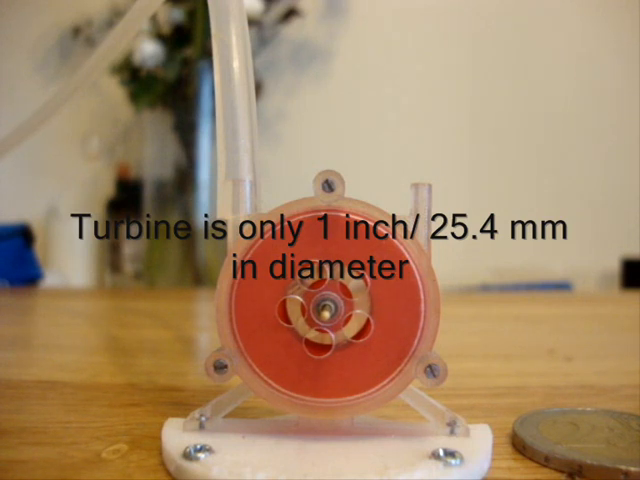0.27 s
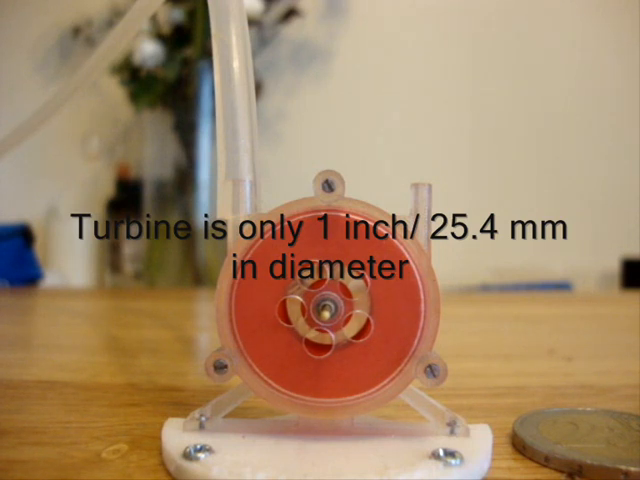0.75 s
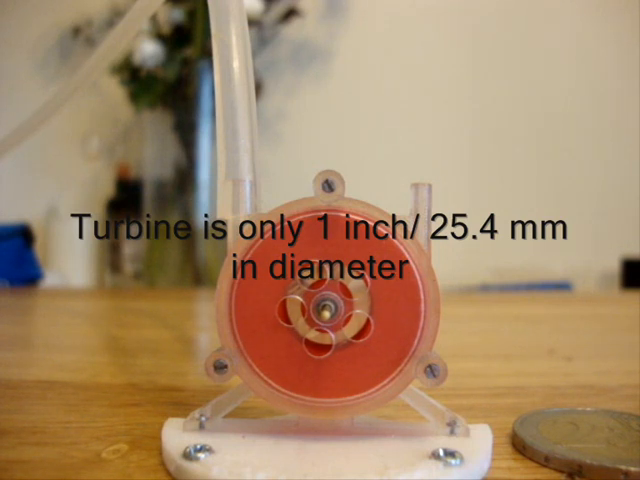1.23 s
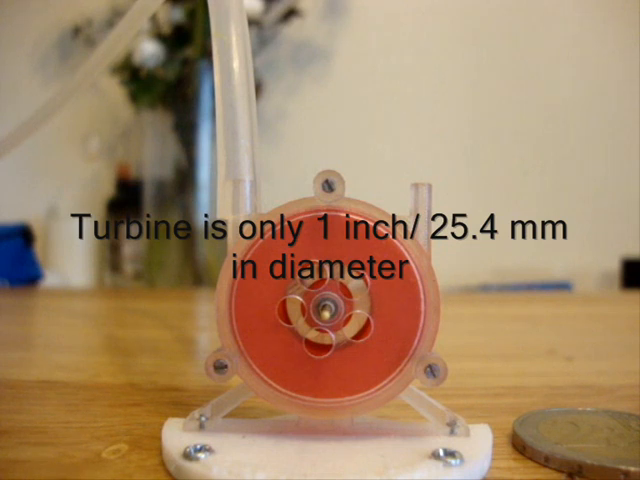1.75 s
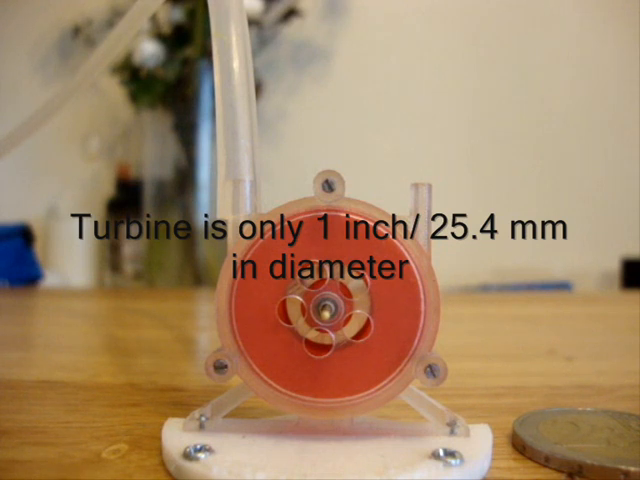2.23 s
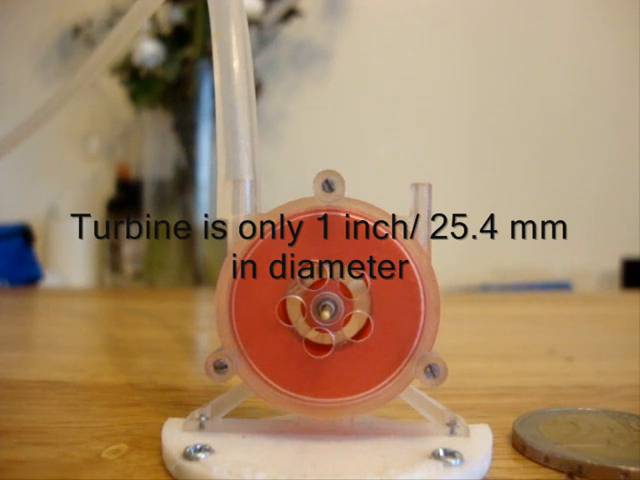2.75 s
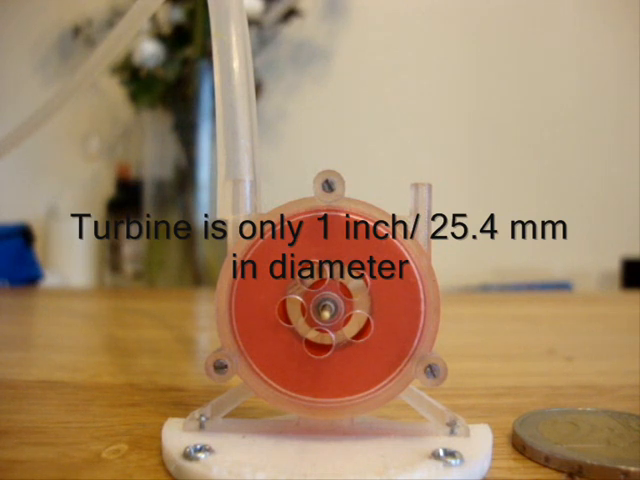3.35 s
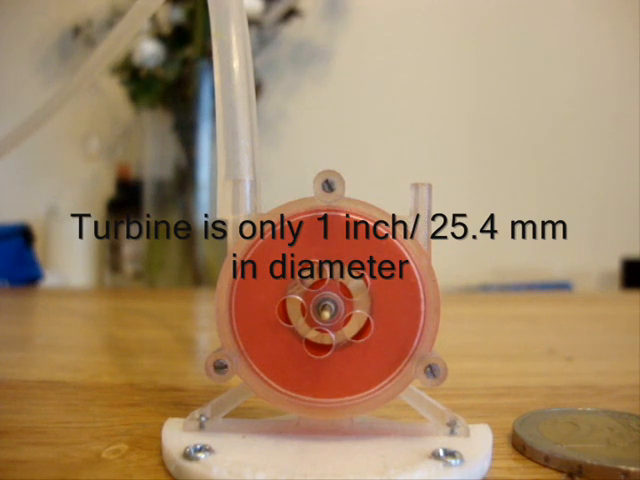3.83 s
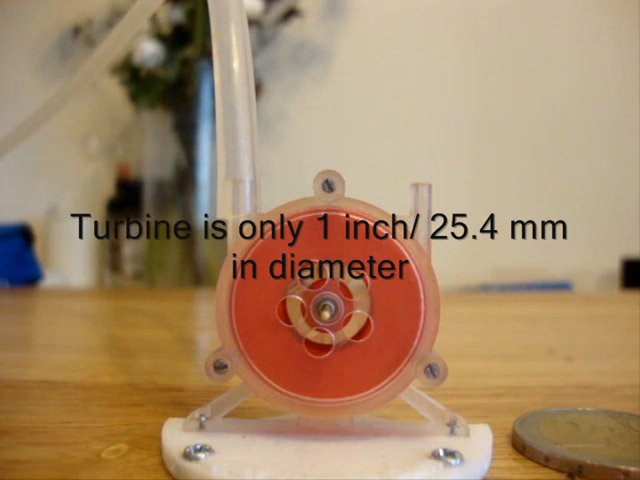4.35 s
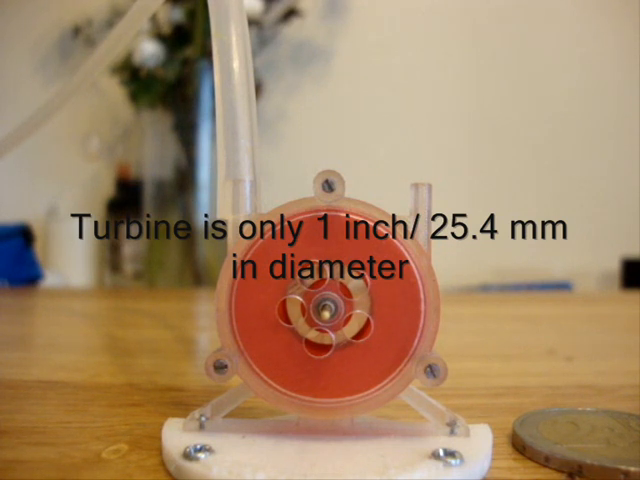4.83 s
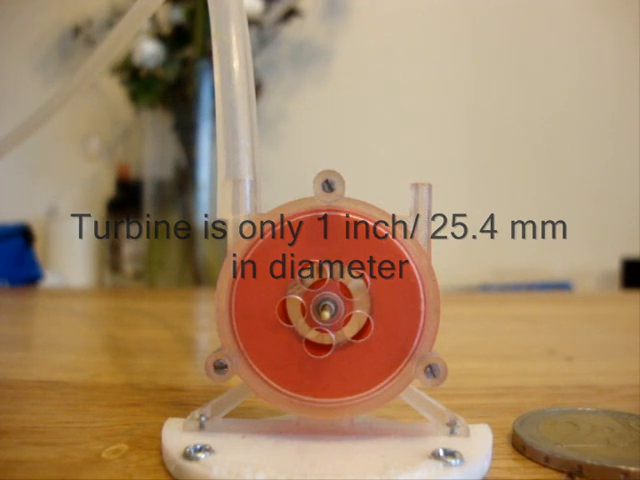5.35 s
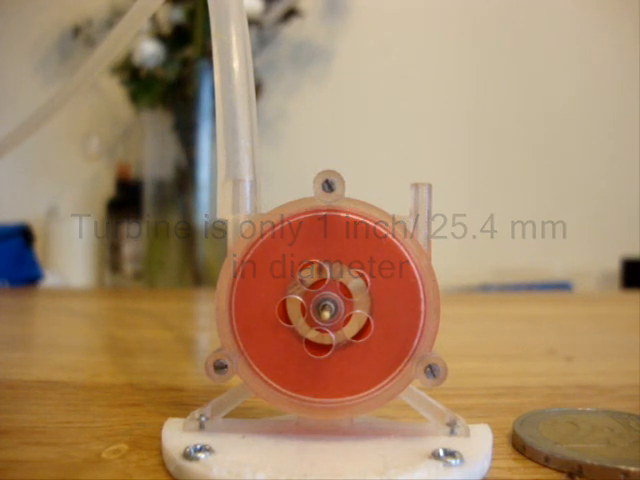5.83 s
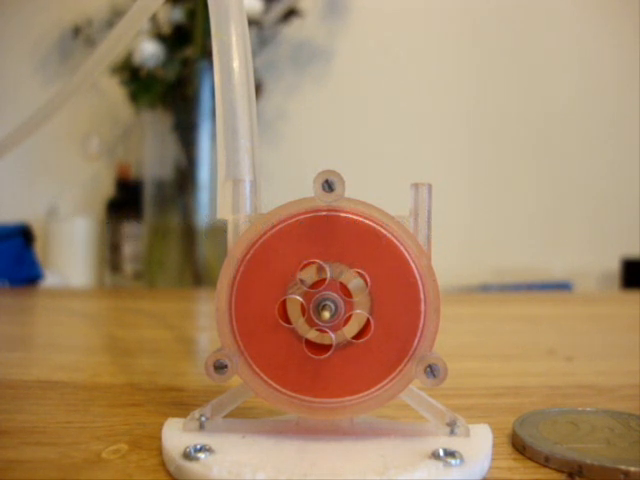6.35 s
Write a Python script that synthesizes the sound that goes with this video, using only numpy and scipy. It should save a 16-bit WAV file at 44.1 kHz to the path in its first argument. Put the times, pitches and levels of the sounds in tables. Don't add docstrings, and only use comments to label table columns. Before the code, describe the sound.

Already running at the start, a small disc turbine driven by fed air hisses close to a small camera microphone in a quiet indoor room. The hiss is bright and narrow, strongest around 4 to 5 kHz, with thinner air leaking above and a weaker hollow rush below. It is ragged and grainy, with tiny dropouts and brief spits near 0.7 and 1.2 seconds. From about 1.2 to 1.6 seconds the lower, breathy part dulls slightly, then returns. The pulsing, about 24 beats a second and barely noticeable at first, becomes a clear flutter by 3 seconds. From 3 to 5 seconds spits come more often as the hiss swells. By 6 seconds it is plainly louder, chopped around 50 times a second into a rough, buzzing purr. Faint hum, a soft tube note and low room murmur remain beneath; the hiss is still going when it cuts at 6.6 seconds.

```python
import sys
import numpy as np
from scipy import signal
from scipy.fft import rfft, irfft
from scipy.io import wavfile
from scipy.ndimage import uniform_filter1d

SR = 44100
rng = np.random.default_rng(int(sys.argv[2]) if len(sys.argv) > 2 else 0)


def to_linear_factor(level_db):
    exponent = np.asarray(level_db, float) / 20
    return 10 ** exponent


def generate_wav(sig):
    pcm = np.round(np.clip(np.atleast_2d(sig).T, -1, 1) * 32767).astype(np.int16)
    wavfile.write(sys.argv[1], SR, pcm)


N = 290178
T = np.arange(N) / SR

# time_s, level_db
FLOW = [(0, -41), (.9, -39), (1.4, -39.5), (1.8, -38.5), (2.3, -37.5), (2.8, -38), (3.2, -37), (3.6, -37),
        (4, -36.5), (4.8, -35.5), (5.5, -34.5), (6, -34), (6.58, -34)]
# time_s, depth_factor
CHOP_DEPTH = [(0, 0.092), (1.5, 0.18), (3, 0.65), (4.5, 0.9), (6.58, 1.17)]
# peak_s, peak_db
PUFFS = [(0.6985, -12), (0.821, -19), (1.163, -8), (1.42, -26), (1.905, -22), (2.139, -18), (2.798, -13),
         (3.0594, -9), (3.3223, -13), (3.6716, -22), (3.791, -13), (3.9145, -10), (4.1953, -7),
         (4.401, -11), (4.4458, -14), (4.627, -17), (4.7095, -7), (4.928, -6), (5.013, -19), (5.312, -9),
         (5.43, -21), (5.5395, -13), (5.6146, -18), (5.653, -13), (5.696, -12), (6.0736, -8), (6.354, -12),
         (6.414, -5.5)]
# once_a_turn_db, peak_angle_turns, twice_a_turn_db, peak_angle_turns
SWING = dict(jet=(1.7, .95, .9, .83), edge=(2.2, .96, .5, .85), leak=(1.3, .97, .2, .95),
         outlet=(2.3, .97, .6, .98), casing=(1.9, .96, .3, .95), tube=(.9, .99, .3, .1))
# mid_flow_level_db, follow_db_per_jet_db, shaded_change_db
PATHS = dict(casing=(-43.5, 0.66, -1.4), outlet=(-46.5, 0.46, -4), tube=(-55.5, 0.41, -.3))


def evened(x):
    return x / np.sqrt(np.mean(x ** 2) + 1e-20)


def curve(rows, column=1):
    rows = np.array(rows, float)
    return np.interp(T, rows[:, 0], rows[:, column])


def coloured(x, points):
    size = 8192
    point_hz, point_db = np.transpose(points)
    hz = np.fft.rfftfreq(size, 1 / SR)
    gain_db = np.interp(np.log(hz + 1), np.log(point_hz), point_db, -60, -60)
    log_gain = np.log(to_linear_factor(gain_db))
    log_gain = np.r_[log_gain, log_gain[-2:0:-1]]
    phase = -signal.hilbert(log_gain).imag
    taps = np.fft.ifft(np.exp(log_gain + 1j * phase)).real[:size // 2]
    return signal.oaconvolve(x, taps / np.linalg.norm(taps))[:N]


def turbine():
    gusts = puffs()
    fast = eddies(500, 0.26, 0.23)
    slow = eddies(60, 1.8, 15.0)
    shell = eddies(300, 0.55, 0.76)
    sag_db = chokes(14, 5.2, -5.5)
    upper = (nozzle_jet(fast, slow, sag_db, gusts) + disc_edge(fast, slow, shell, sag_db, gusts)
             + leak(fast, slow, shell, sag_db, gusts))
    return upper + outlet(fast, slow, shell) + casing(fast, shell) + feed_tube(shell)


def nozzle_jet(fast, slow, sag_db, gusts):
    # hz, db
    jet_colour = [(2900, -40), (3700, -15), (4200, -3), (4600, -1), (5200, -4.5), (5600, -10.5),
                  (6200, -36)]
    swing_db = 2.06 * fast + .3 * slow + chop(*SWING["jet"])
    return air(jet_colour, curve(FLOW) - 0.8 + sag_db, swing_db, gusts)


def disc_edge(fast, slow, shell, sag_db, gusts):
    # hz, db
    edge_colour = [(4800, -30), (5400, -1.5), (5900, 1), (6600, 0.5), (7950, -3.5), (8200, -14),
                   (9000, -28)]
    swing_db = 2.2 * fast + 0.39 * shell + 0.12 * slow + chop(*SWING["edge"])
    return air(edge_colour, curve(FLOW) - 7.5 + 0.53 * sag_db, swing_db, to_linear_factor(-7.5) * gusts)


def leak(fast, slow, shell, sag_db, gusts):
    # hz, db
    leak_colour = [(6500, -23), (8000, -9.5), (8300, -0.5), (9000, -0.5), (9600, 2), (9900, 4),
                   (10130, -14), (10600, -31)]
    swing_db = 1.4 * fast + 1.4 * shell + 0.25 * slow + chop(*SWING["leak"])
    return air(leak_colour, curve(FLOW) - 18 + 0.37 * sag_db, swing_db, to_linear_factor(-31) * gusts)


def outlet(fast, slow, shell):
    # hz, db
    outlet_colour = [(1210, -43), (2050, -4.5), (2220, 1), (2410, -3), (2930, -0.5), (3250, -4), (3700, -5),
                     (4810, -28), (8140, -120)]
    swing_db = 1.0 * fast + 1.66 * shell + .4 * slow + chop(*SWING["outlet"])
    return air(outlet_colour, path_db(*PATHS["outlet"]), swing_db)


def casing(fast, shell):
    # hz, db
    casing_colour = [(450, -38), (690, -14.5), (755, -4.5), (800, -7), (920, -5), (990, 0.5), (1100, -2),
                     (1280, -1.5), (1410, -8.5), (1490, -1), (1550, -6.5), (1615, 0.5), (1790, -1.5),
                     (1850, -3), (2050, -11.5), (2400, -17)]
    swing_db = 0.37 * fast + 1.4 * shell + chop(*SWING["casing"])
    return air(casing_colour, path_db(*PATHS["casing"]), swing_db)


def feed_tube(shell):
    # hz, db
    tube_colour = [(150, -40), (250, -5.5), (360, -2.5), (420, 0), (520, 0.5), (600, -1.5), (700, -0.5),
                   (900, -19)]
    return air(tube_colour, path_db(*PATHS["tube"]), 0.5 * shell + chop(*SWING["tube"]))


def air(colour, level_db, swing_db, extra=0):
    size = to_linear_factor(level_db) * evened(to_linear_factor(swing_db))
    return coloured(np.hypot(size, extra) * rng.standard_normal(N), colour)


def path_db(mid_db, follow, shaded_db):
    mid_flow_db = -37
    shade_start_s, shade_end_s, shade_edge_s = 1.22, 1.64, 0.046
    inside = np.minimum(T - shade_start_s, shade_end_s - T) / shade_edge_s + .5
    return mid_db + follow * (curve(FLOW) - mid_flow_db) + shaded_db * np.clip(inside, 0, 1)


def chop(first_db, first_at, second_db, second_at):
    # time_s, rotor_turns_per_s
    speed = [(0, 24.15), (6.58, 54.04)]
    start_turn = .55
    turns = start_turn + np.cumsum(curve(speed)) / SR
    once = first_db * np.cos(2 * np.pi * (turns - first_at))
    twice = second_db * np.cos(4 * np.pi * (turns - second_at))
    return curve(CHOP_DEPTH) * (once + twice)


def puffs():
    puff_ms = 3.7
    out = np.zeros(N)
    u = np.arange(1200) / SR * 1000 / puff_ms
    shape = np.minimum(2.0 * u, 1) * np.exp(-u ** 2)
    for peak_s, peak_db in PUFFS:
        part = out[round(peak_s * SR):][:len(u)]
        part += (to_linear_factor(peak_db - 18.0) * shape)[:len(part)]
    return out


def chokes(per_s, length_ms, depth_db):
    chance = per_s * (.4 + .6 * curve(CHOP_DEPTH)) / SR
    ends = rng.uniform(0.25, 1, N) * (rng.random(N) < chance)
    ends[[round(row[0] * SR) for row in PUFFS]] = 1
    before = np.arange(800)[::-1] / SR * 1000 / length_ms
    sag = signal.oaconvolve(ends, np.exp(-before ** 2))[799:799 + N]
    return depth_db * np.minimum(sag, 1)


def eddies(per_s, rise_ms, fall_ms):
    kicks = rng.exponential(1, N) * (rng.random(N) < per_s / SR)
    for ms in (rise_ms, fall_ms):
        kicks = signal.lfilter([1], [1, -np.exp(-1000 / (ms * SR))], kicks)
    kicks = np.log(kicks / kicks.mean() + 0.1)
    return evened(kicks - uniform_filter1d(kicks, size=6000))


def hum():
    # pitch_hz, width_hz, start_db, middle_db, end_db
    hum_tones = [
        (120, 3.6, -83, -82, -79),
        (245.4, 4.9, -85.5, -73, -87),
        (416, 18.4, -64, -66, -58.5),
    ]
    out = np.zeros(N)
    for pitch_hz, width_hz, *level_db in hum_tones:
        pole = np.exp(-np.pi * width_hz / SR)
        waver = signal.lfilter([1], [1, -pole], rng.standard_normal((2, N)))
        angle = 2 * np.pi * pitch_hz * T
        tone = evened(waver[0] * np.cos(angle) + waver[1] * np.sin(angle))
        out += to_linear_factor(np.interp(T, [0, 2.6, 4.6], level_db)) * tone
    return out


def room_murmur():
    # hz, db
    room_colour = [(2, -10), (20, -7.5), (150, -6), (250, -2.5), (320, -38)]
    return to_linear_factor(-67.5 + 0.27 * T) * coloured(rng.standard_normal(N), room_colour)


def scene():
    return (turbine() + room_murmur() + hum())[None]


def gated(x, depth_db=-18):
    # band_hz, threshold_db against the running mean
    gate_under = [(4400, -8), (5100, -3.5), (6100, -4), (7600, -6.5)]
    low_hz, high_hz, width_hz = 4400, 7600, 350
    hz, _, z = signal.stft(x, SR, nperseg=256, noverlap=192)
    power = uniform_filter1d(abs(z) ** 2, size=4, axis=1)
    share = power / uniform_filter1d(power, size=300, axis=1)
    around = share[(hz > 5000) & (hz < 8000)].mean(0)
    for low in range(low_hz, high_hz, width_hz):
        band = (hz >= low) & (hz < low + width_hz)
        under_db = np.interp(low, *np.transpose(gate_under))
        sunk = share[band].mean(0) ** .75 * around ** .5 < to_linear_factor(2 * under_db)
        z[band] *= np.where(sunk, to_linear_factor(depth_db), 1)
    return signal.istft(z, SR, nperseg=256, noverlap=192)[1][:N]


def grit(x):
    # hz, db
    grit_colour = [(8000, -43), (10000, -4.5), (11400, -7), (12000, -4.5), (13800, -3.5), (15200, -3.5),
                   (15900, 6)]
    step = np.sqrt(signal.lfilter([.08], [1, -.92], x ** 2))
    return to_linear_factor(-18.5) * coloured(step * rng.standard_normal(N), grit_colour)


def band_limit(x):
    return signal.sosfilt(signal.butter(12, 17070, fs=SR, output="sos"), x)


def record(dry):
    edge_hz = 15730
    kept = gated(dry[0])
    gritty = kept + grit(kept)
    limited = irfft(rfft(gritty) * (np.fft.rfftfreq(N, 1 / SR) < edge_hz), N)
    return band_limit(limited[None])


dry = scene()
out = record(dry)
generate_wav(out)
```